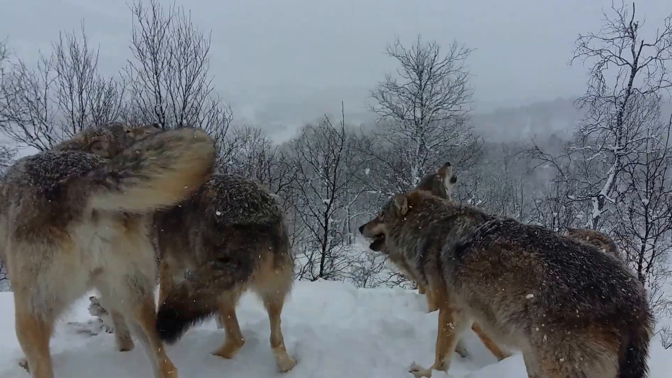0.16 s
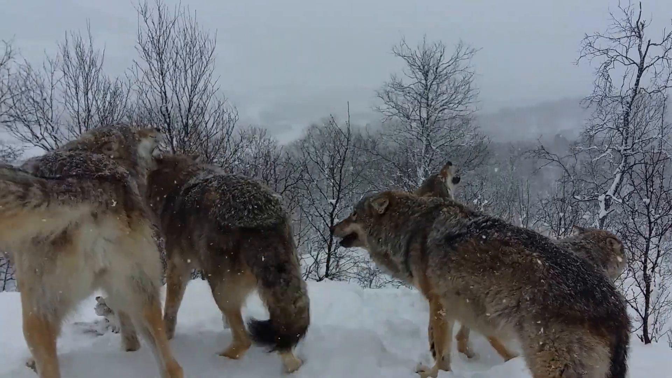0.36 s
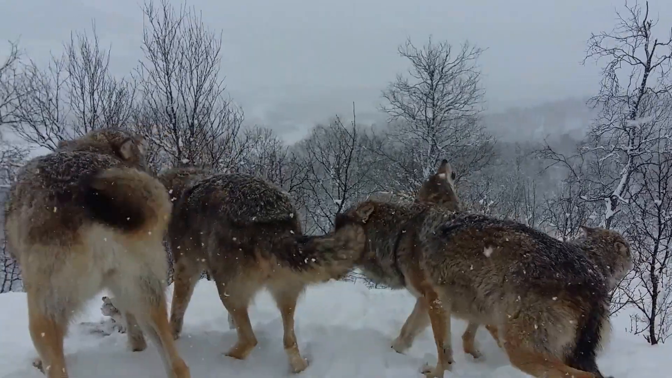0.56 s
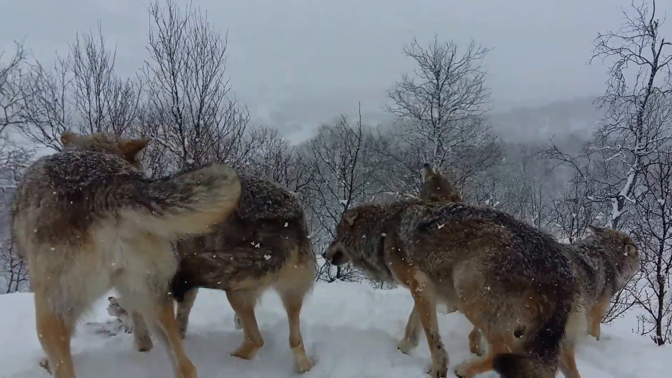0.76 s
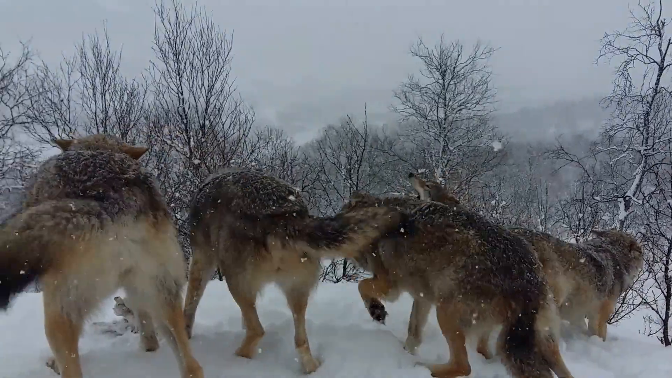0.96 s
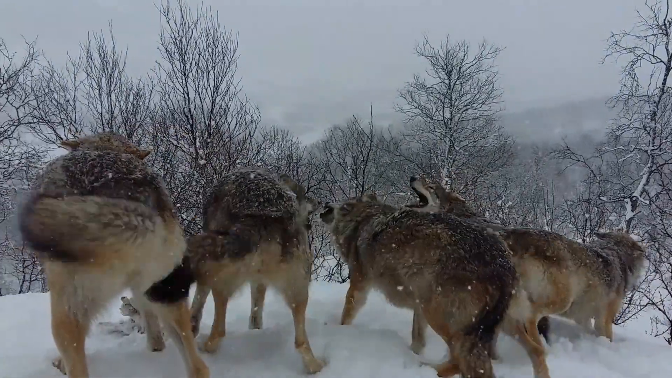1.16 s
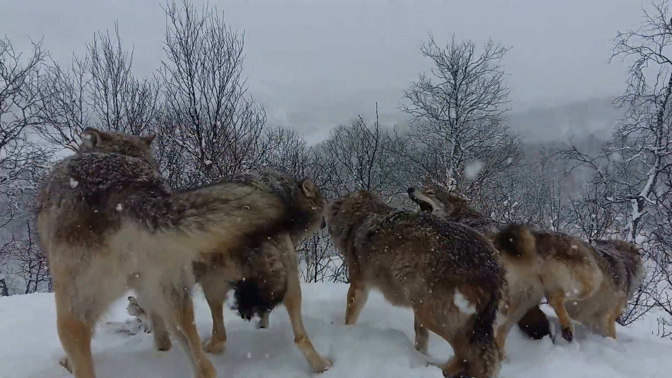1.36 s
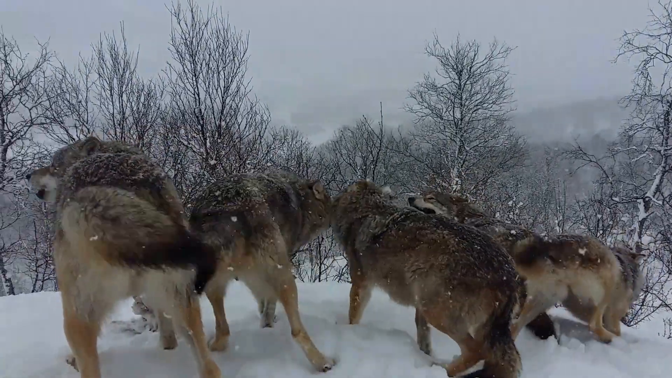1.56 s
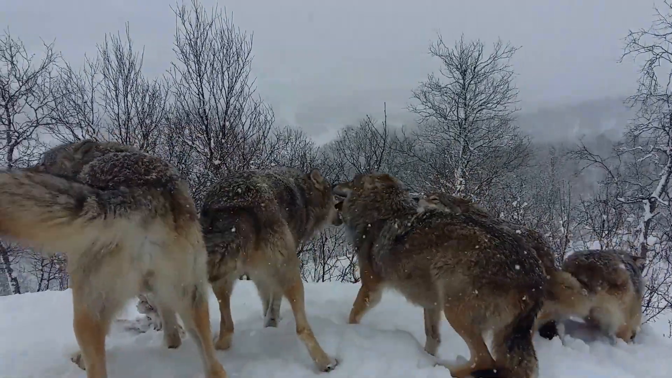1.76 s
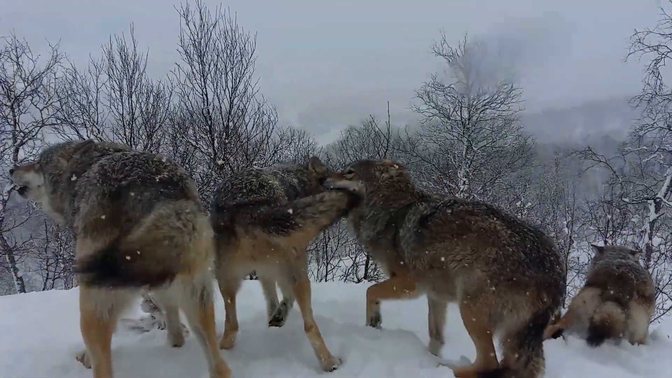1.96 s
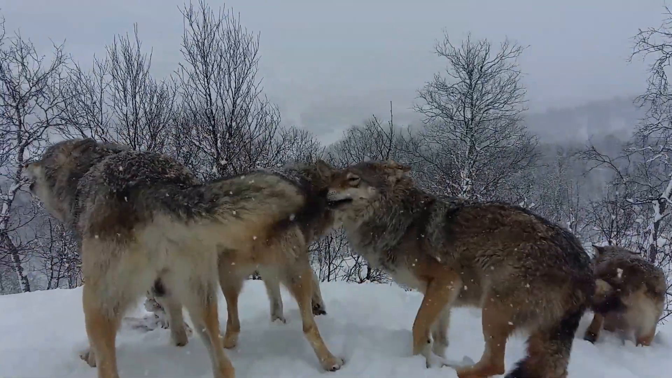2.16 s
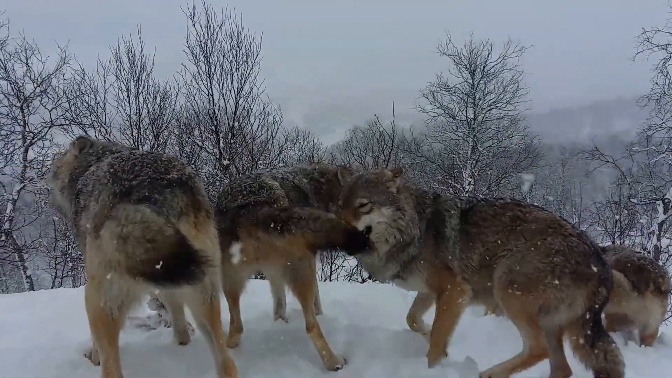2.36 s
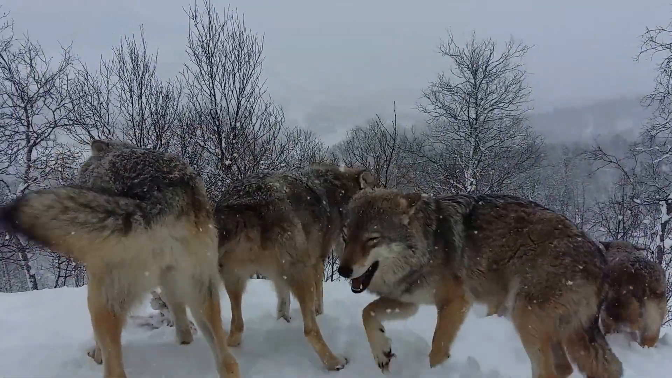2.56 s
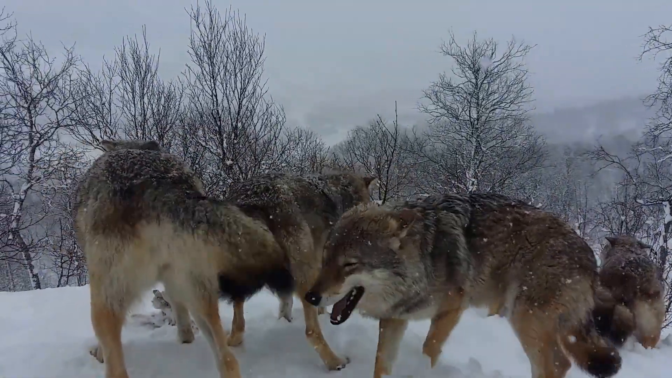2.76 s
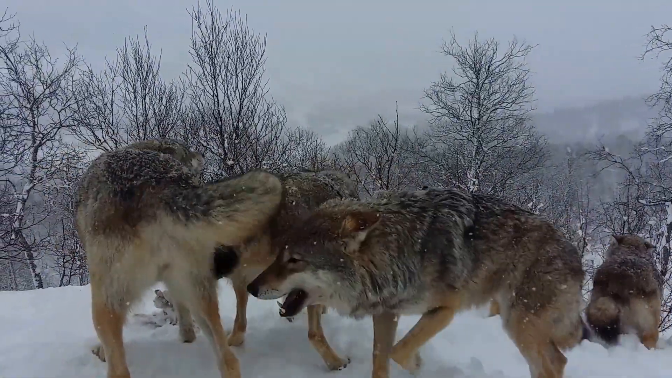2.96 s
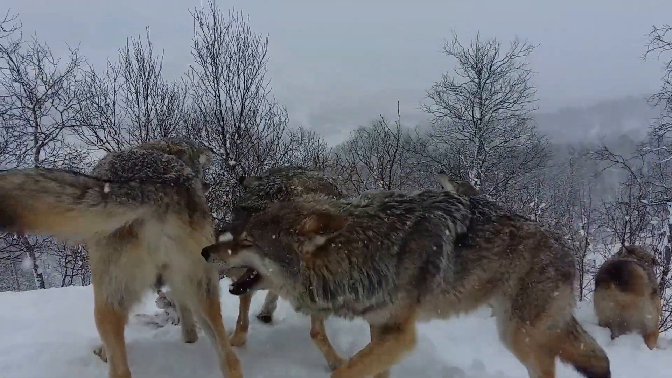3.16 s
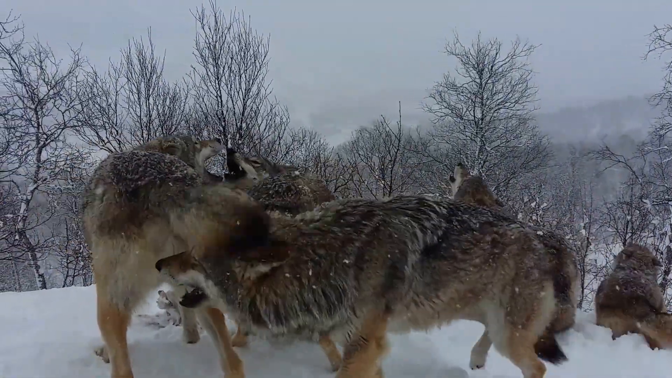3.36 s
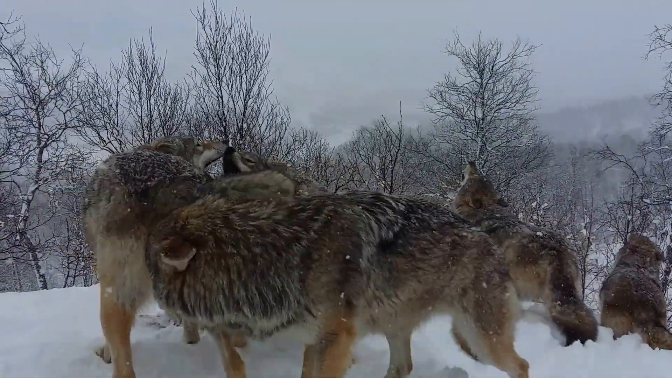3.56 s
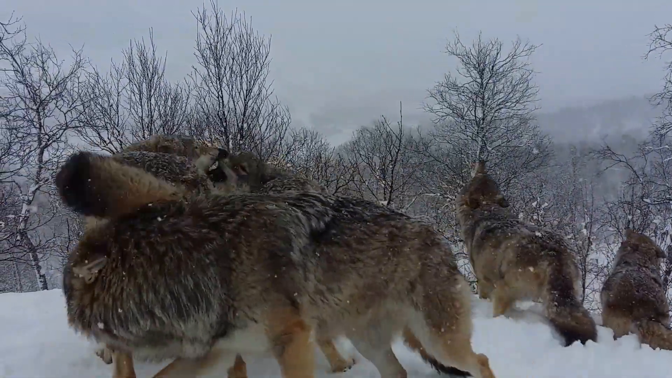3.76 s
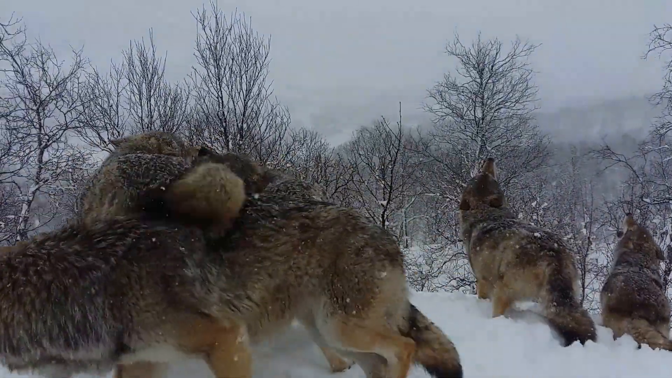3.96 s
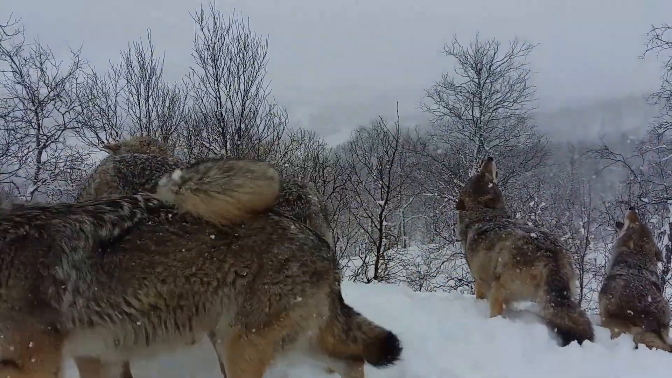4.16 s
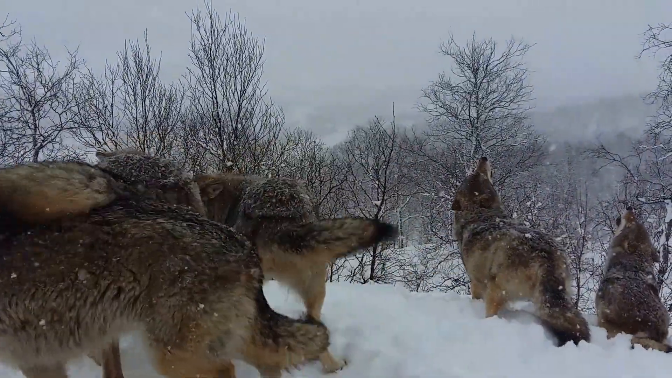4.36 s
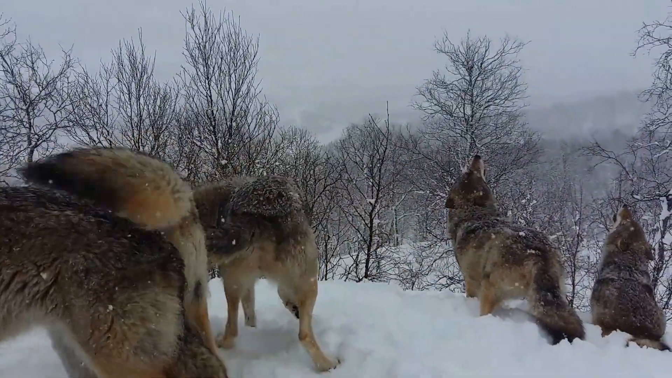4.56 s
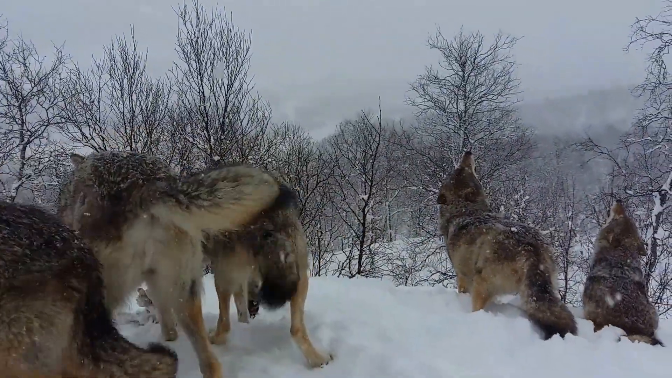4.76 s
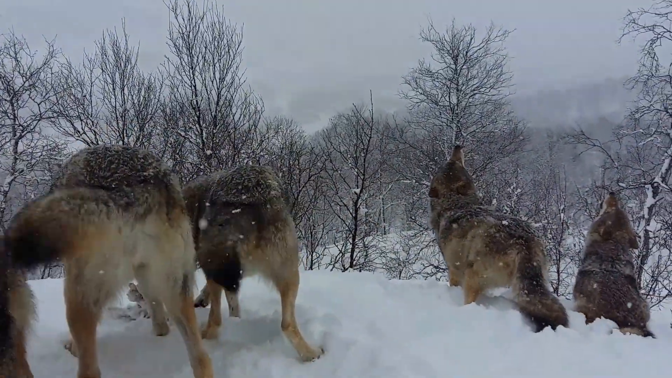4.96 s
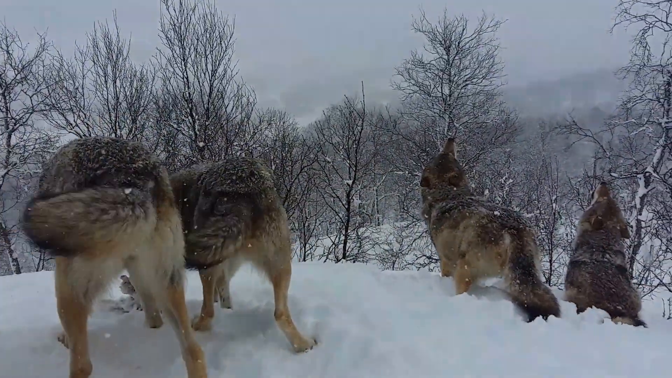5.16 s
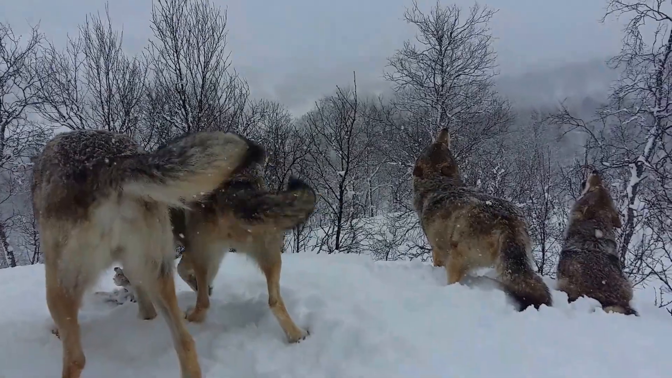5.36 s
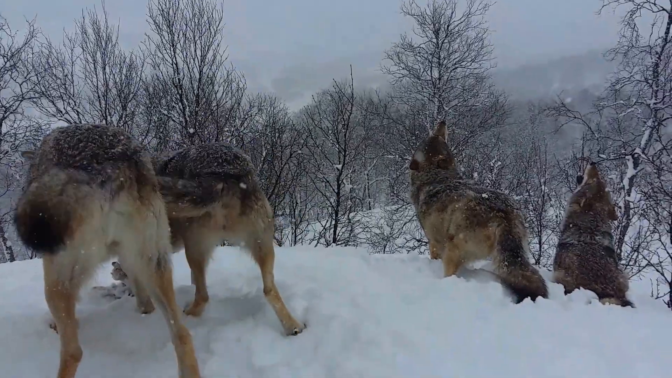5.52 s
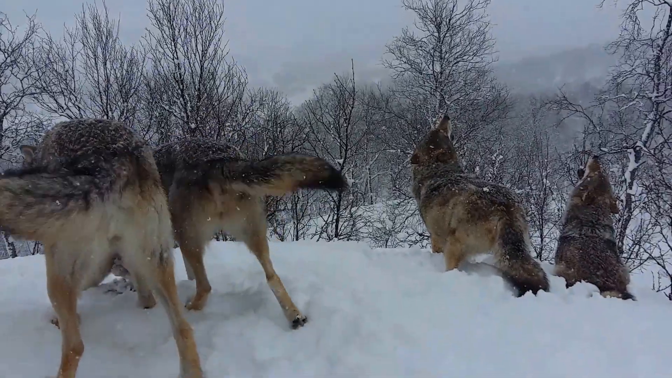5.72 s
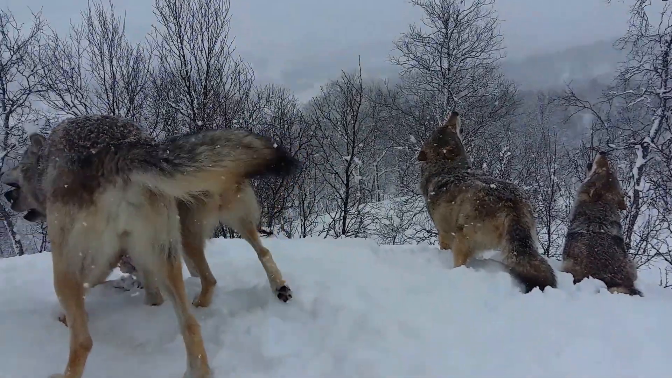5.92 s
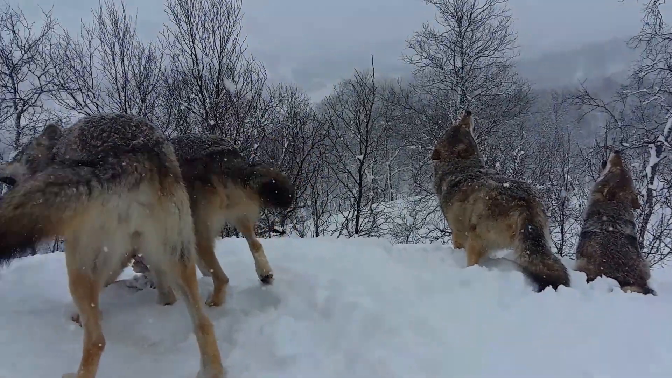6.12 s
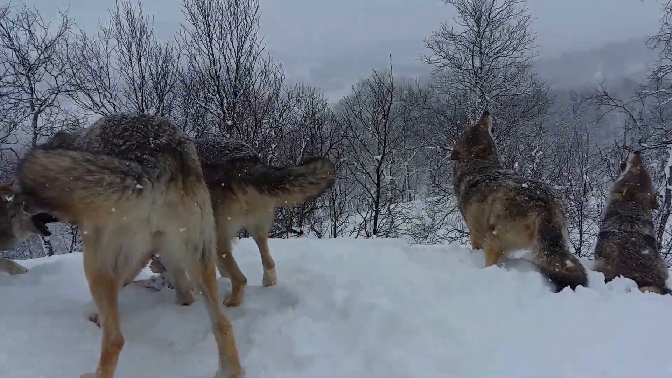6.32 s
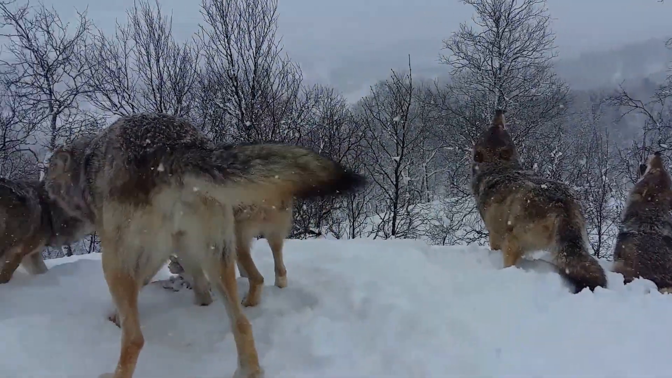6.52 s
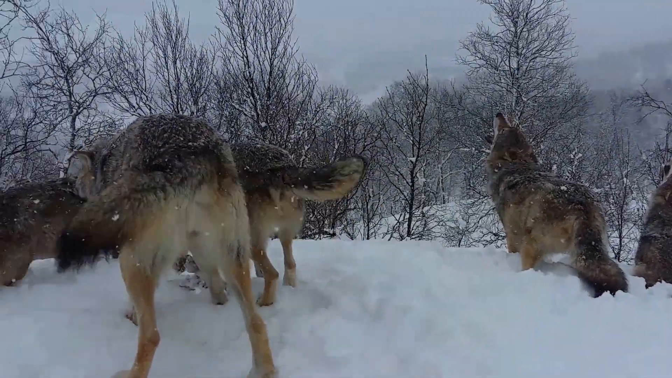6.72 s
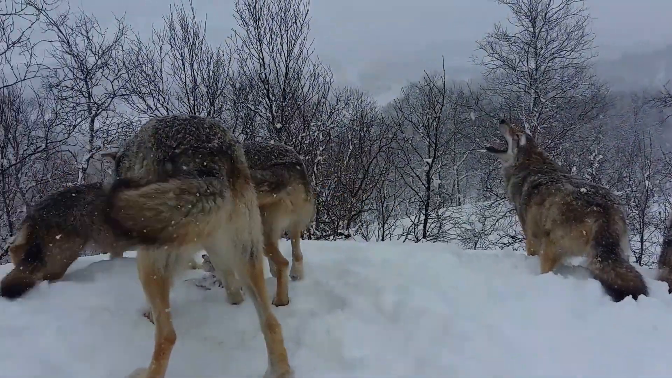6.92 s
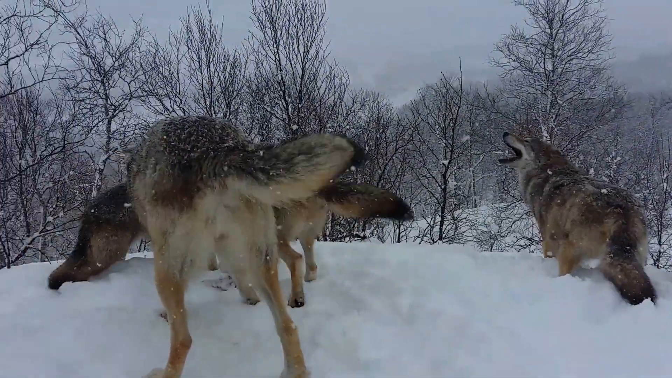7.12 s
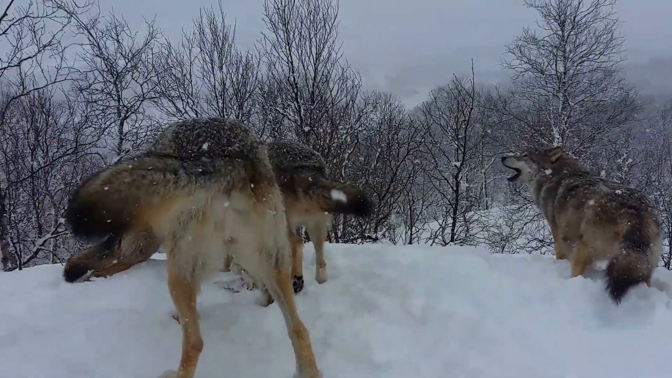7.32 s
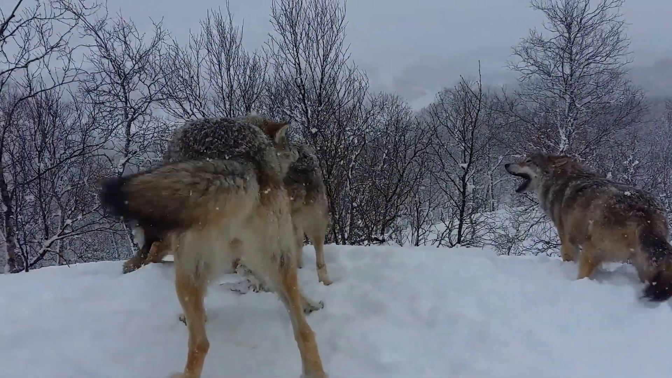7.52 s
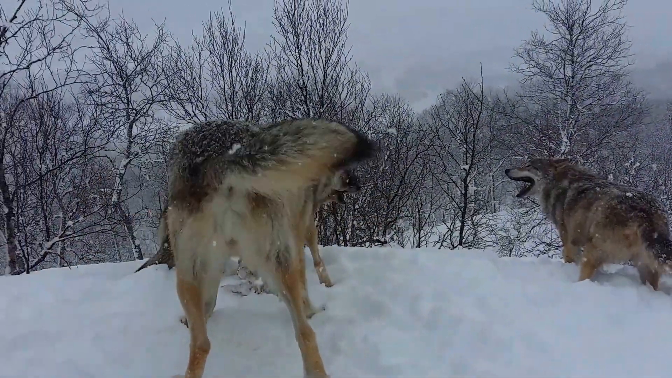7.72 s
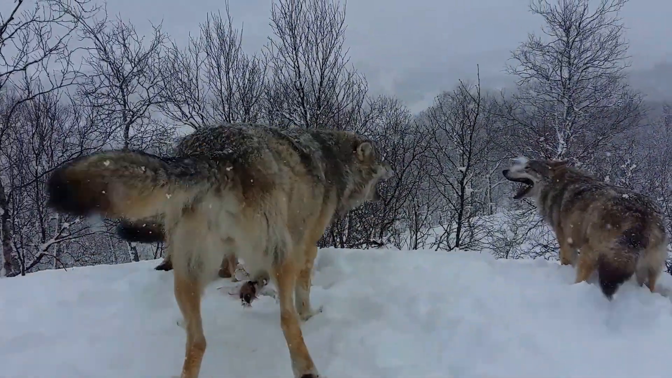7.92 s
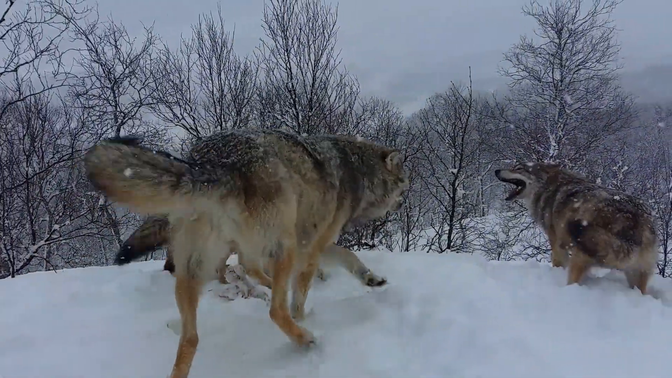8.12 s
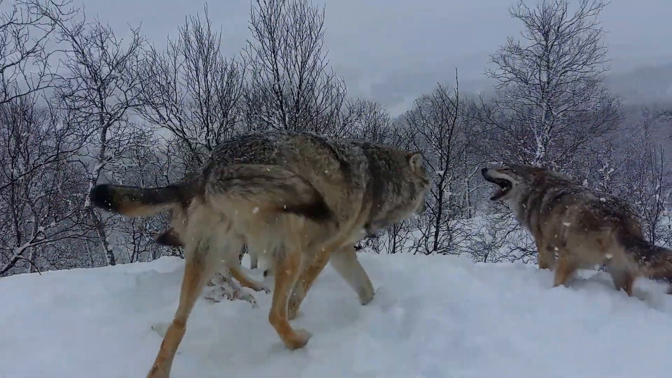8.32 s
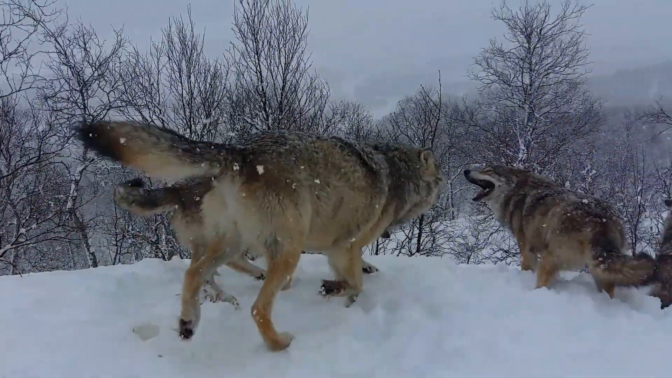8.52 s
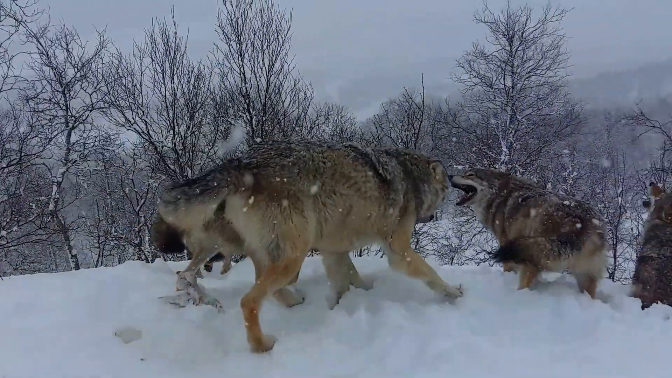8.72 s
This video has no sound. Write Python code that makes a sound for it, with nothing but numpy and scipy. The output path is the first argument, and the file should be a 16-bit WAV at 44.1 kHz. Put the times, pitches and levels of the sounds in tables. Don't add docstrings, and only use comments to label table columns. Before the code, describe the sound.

Close stereo sound of a howling wolf pack in snowy open country. Eight or so near voices slur and cross continually, from low groans to clear, whistle-like high howls, with short hoarse cracks. Farther wolves fill the background. The chorus is thickest through the first six seconds, then thins into longer mid and low howls, with a few later yelping peaks. Soft paw thuds and airy snow rustle lie underneath, with very little echo.

```python
import sys
import numpy as np
from scipy import signal
from scipy.fft import rfft, irfft, next_fast_len
from scipy.io import wavfile
from scipy.ndimage import uniform_filter1d, minimum_filter1d, map_coordinates

SR = 44100
rng = np.random.default_rng(int(sys.argv[2]) if len(sys.argv) > 2 else 0)


def int16_out(signal):
    q = np.round(np.clip(np.atleast_2d(signal).T, -1, 1) * 32767)
    wavfile.write(sys.argv[1], SR, q.astype(np.int16))


def elevation(decibels):
    levels = np.asarray(decibels, float)
    return 10 ** (levels / 20)


N = 387330

# freq_hz, gain_db
MUZZLE = [(2050, 2), (2380, -8.5), (2650, -30), (3700, -93)]
# freq_hz, level_db (re fundamental)
BUZZ = [(1500, -53), (2600, -42.5), (3300, -40.5), (4500, -39), (6000, -45), (7200, -55), (10000, -73)]
# time_s, buzz_db
FACING = [(.3, 7.5), (1.9, 2.5), (2.5, 0.5), (3.5, 9), (4.5, 2.5), (5.3, -3.5), (6.0, -1.5), (6.35, 12),
          (6.7, -2), (7.3, -6), (8, 9), (8.7, 4)]

# start_s, end_s, from_hz, to_hz, effort_db
BASS_NOTES = [(.23, .33, 530, 474, -27), (.33, .5, 476, 441, -32.5), (.51, .95, 429.1, 441.2, -30.5),
              (1.31, 1.43, 503, 348.3, -27.5), (1.43, 1.7, 349.4, 339, -27), (1.7, 2.05, 352, 344.3, -21.5),
              (2.05, 2.42, 345, 430, -22.5), (2.42, 2.54, 418, 511, -20), (3.165, 3.44, 435.4, 352.2, -35),
              (3.44, 3.88, 388.1, 424.2, -22), (3.88, 4.035, 421.4, 476, -21),
              (4.035, 4.41, 479, 463.6, -20.5), (4.41, 5.04, 454.7, 490.5, -17),
              (5.04, 5.29, 507, 488, -24.5), (5.33, 5.58, 390, 395, -36.5), (5.61, 5.79, 470, 534.6, -18),
              (5.81, 6.03, 453.7, 412, -28.5), (6.03, 6.33, 443.5, 480.7, -23),
              (6.46, 7.75, 394.4, 411, -46), (8.5, 8.7, 396.5, 400, -34.5), (8.7, 8.81, 401, 430.8, -25.5)]
# start_s, end_s, from_hz, to_hz, effort_db
LOW_NOTES = [(.46, .52, 444, 608, -20.5), (2.055, 2.22, 439.2, 626, -22.5), (2.22, 2.29, 622, 455, -25),
             (2.4, 2.57, 359, 298.3, -33), (2.57, 2.75, 304.9, 342, -37), (2.75, 2.83, 358.6, 420.7, -25),
             (4.45, 5, 314.6, 395.7, -38), (5.19, 5.28, 559, 635, -19.5), (5.3, 5.48, 746.5, 859.5, -18),
             (5.48, 5.55, 835, 576.6, -13), (5.55, 5.61, 627, 587, -21), (5.85, 6.03, 554, 542, -24),
             (6.03, 6.11, 551, 640, -19.5), (6.17, 6.21, 615, 602, -20), (6.23, 6.385, 700, 689, -24.5),
             (6.49, 6.545, 534, 561, -20.5), (6.57, 6.73, 651, 605, -23.5),
             (6.77, 7.06, 641.3, 619.7, -20.5), (7.064, 7.17, 519, 470.5, -22),
             (7.17, 7.4, 609, 567.4, -16.5), (7.425, 7.48, 912, 594.6, -21), (7.48, 7.73, 575, 585.5, -20),
             (7.73, 8.305, 609, 709.5, -21), (8.305, 8.47, 700, 661, -19.5)]
# start_s, end_s, from_hz, to_hz, effort_db
MIDDLE_NOTES = [(.27, .36, 1000, 913.7, -46), (.36, .51, 900, 905, -21), (.51, .55, 901, 713.5, -20.5),
                (.55, .7, 732, 800, -17.5), (.7, .886, 835, 764, -12), (1.153, 1.41, 615.2, 583.7, -18.5),
                (1.41, 1.52, 629, 618.4, -16), (3.153, 3.484, 1258, 1160, -17),
                (3.484, 3.52, 1130, 602, -16.5), (3.66, 3.78, 767, 954, -18), (3.78, 3.83, 929, 850, -12.5),
                (3.83, 4.023, 815, 769, -25), (4.44, 4.9, 591.6, 633.6, -28),
                (4.9, 5.17, 633.7, 659.4, -20.5), (5.54, 5.6, 971, 880, -19.5),
                (5.6, 5.72, 871.6, 801, -22), (5.72, 5.83, 804.5, 836, -19), (5.83, 5.96, 819, 629, -18.5),
                (6.745, 6.82, 742, 727, -16), (6.93, 7.06, 758, 802, -14.5), (7.085, 7.25, 820, 771, -16),
                (7.27, 7.42, 731, 796, -25.5), (7.59, 7.69, 668.4, 868, -18)]
# start_s, end_s, from_hz, to_hz, effort_db
RESTLESS_NOTES = [(.738, .82, 1049, 858.6, -14), (.82, 1, 882, 615, -8), (1.59, 1.66, 843, 1120, -14),
                  (2.055, 2.283, 718, 793, -19), (3.05, 3.39, 865, 761, -13), (3.39, 3.47, 808, 846, -21),
                  (3.47, 3.51, 866, 603, -13.5), (3.54, 3.66, 887, 820, -18),
                  (4.163, 4.354, 1070, 1017, -16.5), (4.354, 4.434, 974, 783, -18),
                  (4.96, 5.356, 1001, 879, -20.5), (5.519, 5.623, 1096, 921, -31),
                  (5.623, 5.79, 981.4, 1023, -21.5), (5.79, 6.04, 922, 792, -15.5),
                  (6.11, 6.15, 992, 1087, -16.5), (6.69, 6.92, 890, 864, -23),
                  (7.16, 7.23, 1400, 1560, -32.5), (7.23, 7.29, 1500, 1040, -25),
                  (8.2, 8.49, 1097, 1033, -24)]
# start_s, end_s, from_hz, to_hz, effort_db
LEAD_NOTES = [(.804, .882, 988, 979, -12), (.882, 1.074, 996.4, 580, -15), (2.031, 2.107, 1279, 1265, -11),
              (2.107, 2.303, 1243, 814, -9), (2.303, 2.54, 781, 972, -20.5), (2.79, 3.035, 871, 826, -15.5),
              (3.68, 3.736, 1250, 1485, -19.5), (3.736, 3.915, 1433, 1509, -13),
              (3.915, 4.055, 1496, 1277, -11.5), (4.055, 4.31, 1283, 1193, -17),
              (4.32, 4.42, 1040, 1110, -21), (4.42, 4.46, 1111, 889, -17.5), (4.46, 4.66, 861, 758, -16.5),
              (5.3, 5.45, 1190, 1261, -10.5), (5.45, 5.5, 1234, 896, -16.5), (6.11, 6.362, 861, 932, -18),
              (6.362, 6.53, 936, 1047, -19), (6.53, 6.68, 1042, 982, -18.5), (6.68, 6.74, 988, 1217, -19.5),
              (7.519, 7.72, 846.5, 1004, -24.5), (7.72, 7.86, 843, 844, -12.5)]
# start_s, end_s, from_hz, to_hz, effort_db
RINGING_NOTES = [(.9, .95, 756, 639.6, -21.5), (.95, 1.3, 614.7, 615.2, -17.5),
                 (1.44, 1.53, 790.6, 503.7, -29.5), (1.53, 1.68, 526.5, 554, -34.5),
                 (2.3, 2.42, 765, 476, -25), (2.42, 2.77, 483.5, 473.2, -29.5),
                 (2.77, 2.86, 493.5, 509.7, -28.5), (2.86, 2.92, 554.5, 632, -28),
                 (2.92, 3.04, 642, 485, -29), (4.62, 4.68, 889, 759, -33.5), (4.68, 4.78, 738, 755.6, -29),
                 (4.78, 4.84, 807.5, 1144, -25), (4.85, 4.955, 980, 580, -23.5),
                 (7.72, 7.82, 890.4, 869.8, -38.5), (7.82, 7.9, 851.5, 619.4, -34.5),
                 (7.9, 8.054, 605.7, 533.1, -30.5), (8.054, 8.138, 523, 636, -30.5),
                 (8.138, 8.33, 612, 622, -28), (8.33, 8.505, 620, 615, -31.5),
                 (8.505, 8.81, 600.5, 535.6, -30)]
# start_s, end_s, from_hz, to_hz, effort_db
WARBLING_NOTES = [(.235, .4, 540, 430.2, -25.5), (.4, .95, 437, 446, -27.5), (1.68, 1.8, 430, 425.5, -30),
                  (1.8, 1.9, 440, 450.8, -32), (1.9, 2.07, 475, 452.7, -30.5),
                  (2.07, 2.155, 455, 570, -27.5), (3.03, 3.1, 980, 1148, -16), (3.1, 3.17, 1104, 817, -21),
                  (3.47, 3.57, 700, 800, -18), (3.57, 3.67, 790, 722, -18.5), (5.2, 5.33, 930, 900, -32),
                  (5.33, 5.47, 900, 828, -27), (5.83, 6.05, 850, 877.6, -12.5),
                  (6.2, 6.36, 1020, 1095, -26.5), (6.47, 6.56, 700, 720, -23.5),
                  (7.87, 8.06, 490, 520, -32), (8.06, 8.25, 510, 580, -33)]
# start_s, end_s, from_hz, to_hz, effort_db
GROANING_NOTES = [(.24, .33, 307.5, 432, -32), (3.8, 3.86, 351, 272.4, -37.5),
                  (3.86, 3.95, 290, 261, -46.5), (3.95, 3.99, 270, 385, -41),
                  (6.2, 6.46, 348, 310.7, -52.5), (6.59, 6.63, 287, 264, -39.5),
                  (7.27, 7.5, 290, 279.5, -64.5), (7.55, 7.68, 190, 248.5, -59.5),
                  (7.68, 7.73, 245.7, 345, -47.5), (7.86, 8.05, 317.6, 372, -46),
                  (8.05, 8.5, 339, 340, -41.5)]

# peak_s, pitch_share (ratio), width_s
BASS_BREAKS = [
    (4.47, -0.084, 0.086),
    (4.551, -0.077, 0.11),
    (8.682, -0.045, 0.05),
]
# peak_s, pitch_share (ratio), width_s
LOW_BREAKS = [(2.248, .7, 0.082), (2.671, 0.15, 0.15), (2.51, 0.22, .11), (2.793, .23, 0.077),
              (6.3, .1, 0.14), (7.112, 0.2, .09), (7.536, 0.061, 0.092), (7.957, 0.14, 0.057),
              (8.023, .23, .11), (8.205, .19, 0.11), (8.305, .2, 0.082), (8.387, 0.18, 0.081)]
# peak_s, pitch_share (ratio), width_s
MIDDLE_BREAKS = [(0.726, 0.23, .05), (0.783, 0.12, 0.08), (1.183, 0.09, 0.083), (1.465, 0.34, 0.081),
                 (3.249, 0.15, 0.18), (3.368, 0.18, 0.12), (3.448, 0.092, 0.058), (3.757, 0.13, 0.093),
                 (5.052, -.1, 0.076), (7.162, -0.11, 0.066), (6.987, 0.086, 0.085), (7.321, 0.22, .08),
                 (7.375, -0.071, 0.037)]
# peak_s, pitch_share (ratio), width_s
RESTLESS_BREAKS = [
    (3.194, 0.15, 0.23),
    (3.44, 0.19, 0.12),
    (3.595, 0.2, 0.11),
    (6.78, 0.054, 0.13),
    (6.936, 0.037, 0.046),
]
# peak_s, pitch_share (ratio), width_s
LEAD_BREAKS = [
    (5.381, .06, .16),
    (3.787, -0.054, 0.058),
    (4.126, 0.067, 0.17),
    (4.26, 0.15, 0.14),
    (4.458, -0.1, 0.09),
    (4.608, 0.59, 0.1),
    (7.588, 0.33, .13),
    (7.705, 0.039, 0.0592),
]
# peak_s, pitch_share (ratio), width_s
RINGING_BREAKS = [(1.001, 0.34, .1), (1.117, -0.16, 0.089), (1.177, 0.24, 0.066), (1.258, 0.37, 0.076),
                  (2.497, 0.24, .1), (2.8, 0.12, 0.074), (8.149, .04, .06), (8.217, .07, 0.074),
                  (8.55, .08, 0.1), (8.378, 0.29, 0.09), (8.463, .3, 0.061), (8.7, -.05, 0.08)]
# peak_s, pitch_share (ratio), width_s
WARBLING_BREAKS = [(0.452, 0.0418, 0.0645), (0.536, 0.0369, 0.0962), (0.634, 0.0298, 0.095),
                   (1.742, 0.14, 0.076), (1.859, .03, 0.04), (2, 0.071, 0.062), (3.129, 0.33, 0.12),
                   (3.52, .33, .08), (5.279, .07, .08), (5.385, .13, 0.071), (5.897, .23, .09),
                   (5.981, 0.2, 0.099), (6.288, 0.17, 0.2), (6.51, .2, 0.072), (7.924, 0.18, 0.091),
                   (8, 0.17, 0.079), (8.15, 0.21, 0.082)]
# peak_s, pitch_share (ratio), width_s
GROANING_BREAKS = [
    (6.309, .14, 0.13),
    (7.329, 0.034, 0.1),
    (7.435, 0.11, 0.098),
    (7.971, 0.13, 0.11),
    (8.209, 0.13, 0.07),
    (8.31, 0.22, .1),
]

# time_s,
# second_db, left_lag_us
BASS_STANCE = [(0.499, 5, -25.5), (1.602, 5, -244), (2.397, -10, -244), (3.3, 12.5, 4), (3.702, -17, 53.5),
               (4.7, -9, 105.5), (5.152, 5.5, 40.5), (5.7, -17.5, -12.5), (6.001, 2, 25.5),
               (8.602, 11, 0.5)]
# time_s, second_db, left_lag_us
LOW_STANCE = [(0.499, -6, -49.5), (2.098, -1, -102), (2.604, 19.5, -67), (4.702, 5.5, -8.5),
              (5.201, 7.5, -288), (5.32, -11, -250), (5.5, -5.5, -210), (5.951, 14, -384),
              (6.699, -4, -180), (7.2, -9, -126), (7.55, -17, 282.5), (8.001, -7.5, 51)]
# time_s, second_db, left_lag_us
MIDDLE_STANCE = [(.35, -1, -51), (0.599, -7.5, 2), (0.801, -31, 114.5), (1.302, 1, -53),
                 (3.302, -30.5, -78.5), (3.46, -8.5, -96.5), (3.702, -16.5, -108), (4.7, -0.5, 137.5),
                 (4.999, 2, -100), (5.652, 0.5, -233), (5.897, -9, -233), (7.299, -20, 104.5),
                 (7.65, -2.5, 106.5)]
# time_s, second_db, left_lag_us
RESTLESS_STANCE = [(0.901, -17, -101), (1.998, -13, -38.5), (3.199, -10.5, -12.5), (4.296, -42.5, 141),
                   (5.2, -13, -13), (6.798, -17, 52.5), (7.201, -30, 47.5)]
# time_s, second_db, left_lag_us
LEAD_STANCE = [(0.901, -18.5, -115), (2.499, -22, -24), (2.9, -13.5, -31), (4, -14.5, -147),
               (4.361, -7.5, -120), (4.502, -18, -100), (5.399, -23, -232), (6.401, -21.5, 60.5),
               (7.65, -10.5, 107.5)]
# time_s, second_db, left_lag_us
RINGING_STANCE = [(1.101, 2, -57), (1.26, -11.5, -58.5), (1.501, 16.5, -46.5), (2.701, 11, -13),
                  (4.798, 5.5, -100), (8.001, 15.5, 51.5), (8.601, 18, 58.5)]
# time_s, second_db, left_lag_us
WARBLING_STANCE = [(0.499, 4.5, -49.5), (1.9, 11.5, -27.5), (3.07, -25, -13), (3.599, -8, -100),
                   (5.301, 0.5, -100), (5.9, -12, -200), (6.3, -13.5, -1), (6.501, -16.5, 2),
                   (7.999, 11.5, 57)]
# time_s, second_db, left_lag_us
GROANING_STANCE = [(.3, -6.5, 0.0045), (3.899, -7.5, 0), (6.301, 14, 0.015), (6.599, -19, 0.0095),
                   (7.5, 21.5, 0.0066), (7.6, 4.5, 0.01), (8.2, -9, 0.0098)]

# pitch_hz (mean), level_db, second_db, higher_db (higher partials), left_lag_us
MATES = [(480, -42, 6, -3, -150), (530, -39, 5, -3, -250), (600, -38, 2, -7, 60), (690, -38, 1, -9, -100),
         (800, -38, -3, -12, 100), (950, -39, -8, -16, -60)]
# freq_hz, density_db (per Hz)
AIR = [(25, -30.5), (60, -10.5), (200, -3), (500, -12), (2600, -17), (6000, -30), (8000, -48), (15000, -54)]
# time_s, level_db
BUSTLE = [
    (.9, -1.5),
    (2.2, 2.5),
    (3.6, -6),
    (5.9, 5),
    (6.35, -4.5),
    (6.699, -9),
    (7.499, -11.5),
    (7.8, -6.5),
]
# time_s, peak_db
PAWS = [(.539, -42.5), (.643, -31.5), (1.329, -22.5), (1.39, -26.5), (1.847, -39), (1.95, -33),
        (2.06, -32.5), (2.158, -37.5), (2.272, -36), (2.344, -35), (2.45, -39.5), (3.019, -39.5),
        (4.424, -26.5), (4.74, -37.5), (5.601, -34), (5.755, -26), (6.279, -39), (8.053, -29.5),
        (8.59, -35.5)]
# time_s, level_db
RASPS = [
    (1.46, -31),
    (3.51, -27),
    (6.17, -29),
    (6.34, -33),
    (6.46, -35),
]
# freq_hz, difference_db
BALANCE = [(1500, 0.5), (2300, 7.5), (4000, 6.5), (7000, 3), (9000, -2.5)]


def read(points, hz):
    f, value = np.transpose(points)
    return np.interp(np.log(hz + 1), np.log(f + 1), value)


def follow(points, t):
    return np.interp(t, *np.transpose(points))


def drift(length, rate_hz):
    knots = rng.standard_normal(int(length / SR * rate_hz * 2) + 4)
    return map_coordinates(knots, [np.arange(length) * rate_hz * 2 / SR], order=3)


def colour(x, gain):
    size = next_fast_len(x.shape[-1] + 4096)
    spectrum = rfft(x, size) * gain(np.fft.rfftfreq(size, 1 / SR))
    return irfft(spectrum, size)[..., :x.shape[-1]]


def throat(hz, effort_db, second_db, higher_db, lag_us, buzz_db):
    length = len(hz)
    control = slice(None, None, 32)
    tremble = .016 * (hz / 700) ** .3 * drift(length, 16)
    hz = hz * (1 + tremble)
    glide_speed = abs(np.gradient(np.log(hz))) * SR
    haste = uniform_filter1d(glide_speed, size=2200)[control]
    turns = np.cumsum(hz) / SR
    half_lag = hz * lag_us * 5e-7
    turns = np.array([turns - half_lag, turns + half_lag])
    sound = np.sin(2 * np.pi * turns)
    buzz_db = buzz_db + 2.5 - 1.8 * haste + 1.5 * drift(length, 12)[control]
    for k in range(2, int(10000 / hz.mean()) + 1):
        partial_hz = k * hz[control]
        if k == 2:
            body_db = second_db + .16 * read(MUZZLE, partial_hz)
        else:
            body_db = higher_db + read(MUZZLE, partial_hz)
        edge_db = read(BUZZ, partial_hz) + .23 * higher_db + np.maximum(second_db, 0) * .5 + buzz_db
        gain = elevation(body_db) + elevation(edge_db)
        gain *= elevation(min(2 + .3 * k, 4.5) * drift(length, 8 + 2 * k)[control])
        gain = np.interp(np.arange(length) / 32, np.arange(len(gain)), gain)
        sound += gain * np.sin(2 * np.pi * (k * turns + rng.random()))
    return np.sqrt(2) * elevation(effort_db + 2.4 * drift(length, 16)) * sound


def howl(phrase, breaks, stance, open_db):
    end_s = .012
    s = np.maximum.accumulate(phrase[:, :2].ravel())
    t = np.arange(s[0] - end_s, s[-1] + end_s, 1 / SR)
    flips = 0
    for peak_s, share, width_s in breaks:
        flips = flips + share * np.cos(np.pi * np.clip((t - peak_s) / width_s, -.5, .5)) ** 1.4
    glide = np.interp(t, s, phrase[:, 2:4].ravel())
    pitch = uniform_filter1d(glide * (1 + flips), size=380)
    effort_db = np.interp(t, phrase[:, :2].mean(1), phrase[:, 4])
    when, mouth_db, lag_us = np.transpose(stance)
    second_db = np.interp(t[::32], when, mouth_db)
    higher_db = open_db + 1.52 * np.minimum(second_db, 8)
    voice = throat(pitch, effort_db, second_db, higher_db, np.interp(t, when, lag_us), follow(FACING, t[::32]))
    ends = np.clip(np.minimum(t - t[0], t[-1] - t) / (2 * end_s), 0, 1)
    return round(t[0] * SR), ends * voice


def near_wolves():
    slur_s = .012
    out = np.zeros((2, N + SR))
    # level of the higher partials with the mouth open, dB
    pack = [(BASS_NOTES, BASS_BREAKS, BASS_STANCE, -22),
            (LOW_NOTES, LOW_BREAKS, LOW_STANCE, -14.5),
            (MIDDLE_NOTES, MIDDLE_BREAKS, MIDDLE_STANCE, -11.5),
            (RESTLESS_NOTES, RESTLESS_BREAKS, RESTLESS_STANCE, -43),
            (LEAD_NOTES, LEAD_BREAKS, LEAD_STANCE, -31.5),
            (RINGING_NOTES, RINGING_BREAKS, RINGING_STANCE, -10),
            (WARBLING_NOTES, WARBLING_BREAKS, WARBLING_STANCE, -9.5),
            (GROANING_NOTES, GROANING_BREAKS, GROANING_STANCE, 4)]
    for notes, breaks, stance, open_db in pack:
        notes = np.array(notes)
        breaths = np.flatnonzero(abs(notes[1:, 0] - notes[:-1, 1]) > slur_s) + 1
        for phrase in np.split(notes, breaths):
            at, voice = howl(phrase, breaks, stance, open_db)
            out[:, at:at + voice.shape[1]] += voice
    return out[:, :N]


def far_wolves():
    out = np.zeros((2, N))
    buzz_db = follow(FACING, np.arange(0, N, 32) / SR)
    for hz, level_db, second_db, higher_db, lag_us in MATES:
        agitation = np.clip(hz / 900 + .2 + .25 * drift(N, 1.1), .2, 1.2)
        waver = drift(N, 11)
        flips = .34 * np.tanh(.5 * agitation * (waver + .3 * np.maximum(waver, 0) ** 2))
        slow_glide = .13 * np.tanh(drift(N, .6))
        pitch = hz * np.exp(slow_glide + flips)
        breath_db = level_db + 5.5 * drift(N, 2.5)
        out += throat(pitch, breath_db, second_db, higher_db, lag_us, buzz_db)
    return colour(out, lambda hz: 1 / (1 + (hz / 4500) ** 4))


def hillside(x):
    t = np.arange(SR // 2) / SR
    signs = rng.choice([-1., 1.], (2, len(t)))
    sparse = rng.random((2, len(t))) < .03
    taps = signs * sparse * (t > .01) * elevation(-60 * t / .5)
    taps = colour(taps, lambda hz: 1 / (1 + (hz / 2400) ** 4))
    return signal.oaconvolve(x, taps / np.linalg.norm(taps[0]), axes=1)[:, :N]


def snow():
    thuds, t = np.zeros(N + SR), np.arange(6000) / SR
    for s, peak_db in PAWS:
        thuds[round(s * SR):][:6000] += elevation(peak_db) * (1 - np.exp(-t / .0052)) * np.exp(-t / .019)
    left, other = rng.standard_normal((2, N))
    noise = np.array([left, .92 * left + .4 * other])
    thud = colour(noise * thuds[:N], lambda hz: 1 / (1 + (hz / 260) ** 4) / (1 + (90 / (hz + 1)) ** 3))
    lumpy = noise * elevation(3 * drift(N, 12))
    air = colour(lumpy, lambda hz: elevation(read(AIR, hz)) / (1 + (hz / 1500) ** 2))
    air += colour(lumpy, lambda hz: elevation(read(AIR, hz)) / (1 + (1500 / (hz + 1)) ** 2))
    bustle_db = follow(BUSTLE, np.arange(N) / SR)
    return elevation(19) * thud + elevation(-31 + bustle_db) * air


def rasps():
    t = np.arange(N) / SR
    puffs = sum(elevation(level_db) * np.exp(-((t - s) / .043) ** 2) for s, level_db in RASPS)
    haze_db = -35 + follow(FACING, t) + 3 * drift(N, 14)
    hoarse = elevation(haze_db) * rng.standard_normal((2, N))
    haze = colour(hoarse, lambda hz: 10 * elevation(read(BUZZ, hz)))
    cracks = colour(puffs * rng.standard_normal(N),
                    lambda hz: hz / (hz + 900) * elevation(read(MUZZLE, hz)) + 10 * elevation(read(BUZZ, hz)))
    return haze + cracks


def scene():
    pack = near_wolves() + far_wolves() + rasps()
    return pack + elevation(-26) * hillside(pack) + snow()


def low_pass(x):
    return signal.sosfilt(signal.butter(12, 15750, fs=SR, output="sos"), x)


def record(dry):
    tinted = colour(dry, lambda hz: elevation(np.outer([.5, -.5], read(BALANCE, hz))))
    crest = -minimum_filter1d(-abs(tinted).max(0), size=600)
    limited = tinted / uniform_filter1d(np.maximum(crest / .93, 1), size=600)
    start_s, fade_s, step_s, stepped = .2355, .22, .01, .5
    since = np.arange(N) / SR - start_s
    fade = np.clip((since - stepped * (since % step_s)) / fade_s, 0, 1)
    return low_pass(limited * fade)


dry = scene()
out = record(dry)
int16_out(out)
```